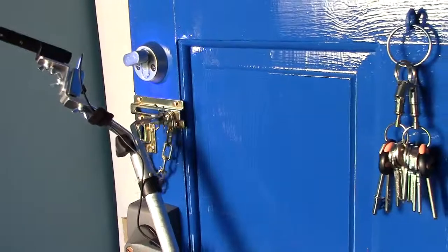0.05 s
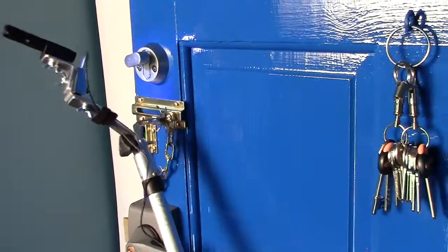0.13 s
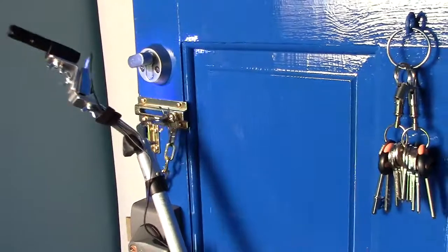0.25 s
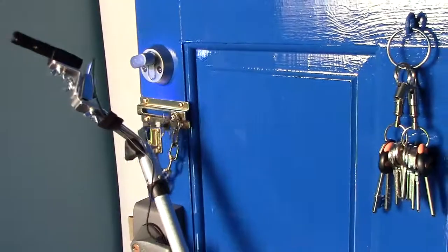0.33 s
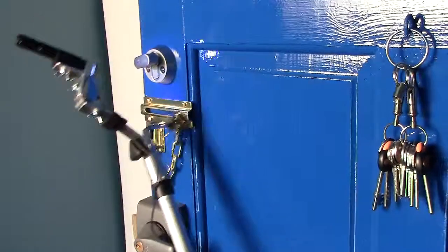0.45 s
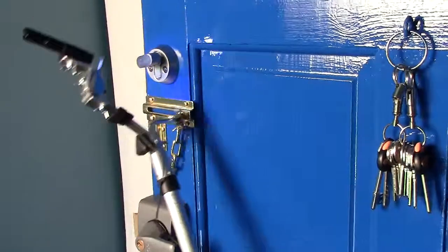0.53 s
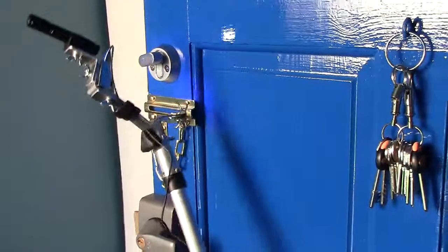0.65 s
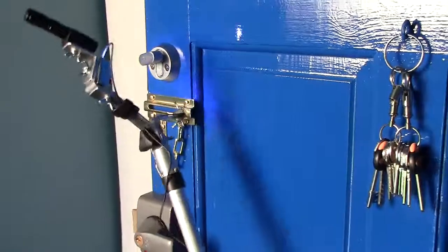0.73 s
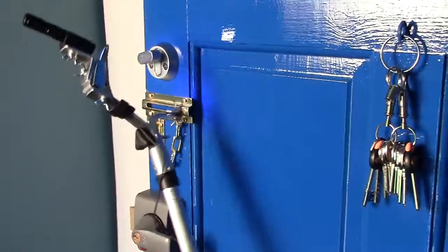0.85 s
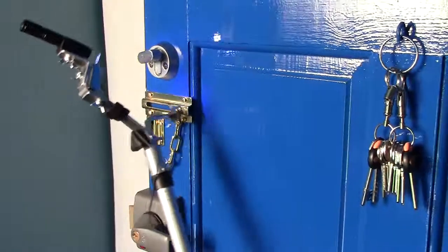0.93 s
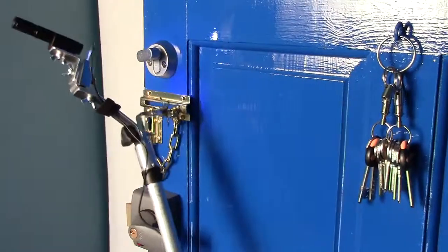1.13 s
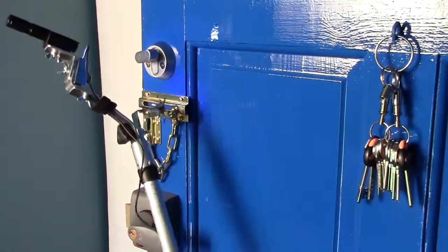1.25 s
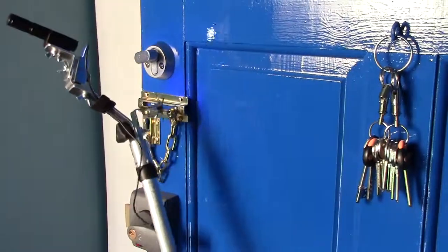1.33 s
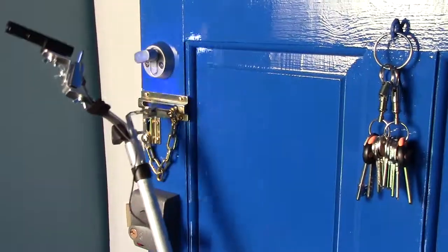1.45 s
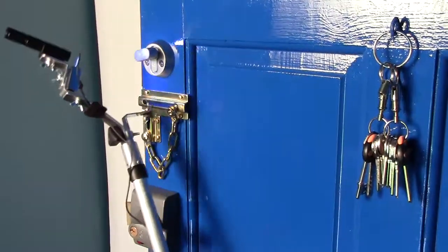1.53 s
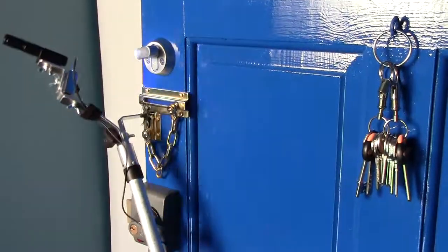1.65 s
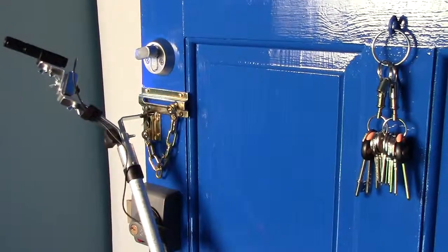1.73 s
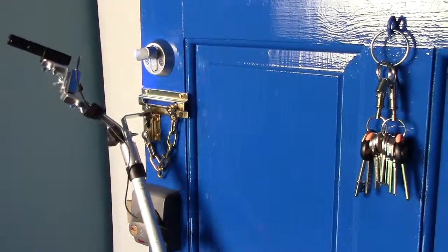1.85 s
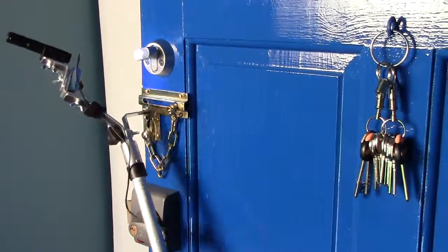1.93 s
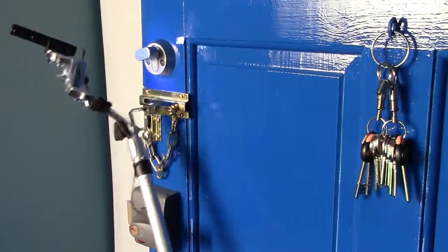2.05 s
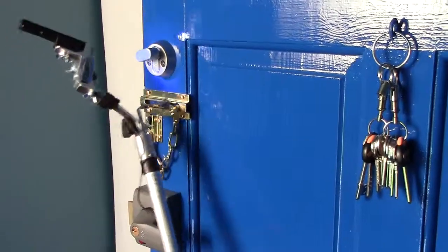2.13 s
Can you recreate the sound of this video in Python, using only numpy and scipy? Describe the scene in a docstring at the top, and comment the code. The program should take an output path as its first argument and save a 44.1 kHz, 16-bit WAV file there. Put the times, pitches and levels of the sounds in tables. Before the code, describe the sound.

Door chain clacking against its metal slide, loudest in the first second, with gritty rubbing and tiny high clinks; afterwards dull door knocks, a light brush and a single tick over quiet indoor hum, heard close.

```python
"""A metal pick tool works a brass door chain in its slide, in a small hard hallway with steady air and a low hum.
The stud's drag (dense random grains) and dull door knocks (slow-swelling low modes) open the scene; dry clacks
(shaped noise cracks over ringing plate modes) follow, with thin clinks of the links (high resonators) among them.
Later the tool brushes the door (fading band of noise) amid more knocks, and its hook gives one tick (short modes).
All the near sounds bounce off the hallway (banded, decaying noise as an echo tail)."""
import sys
import numpy as np
from scipy import signal
from scipy.fft import rfft, irfft
from scipy.io import wavfile
from scipy.ndimage import uniform_filter1d

SR = 44100
rng = np.random.default_rng(int(sys.argv[2]) if len(sys.argv) > 2 else 0)


def int16_out(signal):
    """Quantize to a 16-bit WAV file."""
    q = np.round(np.clip(np.atleast_2d(signal).T, -1, 1) * 32767)
    wavfile.write(sys.argv[1], SR, q.astype(np.int16))


N = 94815  # samples

# Steady air in the hallway: [f/Hz, density level/dB per Hz]
AIR = [(25, -80), (40, -72), (63, -77), (125, -78), (250, -79), (400, -84), (630, -83), (1000, -88),
       (2000, -93), (4000, -97.5), (6300, -101.5), (10000, -106), (13000, -109), (16000, -115)]
# Stereo spread of that air: [f/Hz, side minus mid level/dB]
AIR_SIDE = [(30, -15), (250, -1.5), (1000, -6.5), (4000, -7.5), (14000, -7)]
HUM_HZ, HUM_DB, HUM_T60_S = 41.5, -56, 0.68  # dB is RMS

# Stud dragging along the slide, before its colour: [t/s, level/dB]
DRAG_LEVEL = [(0, -54.5), (.06, -88), (.17, -69), (.19, -48.5), (.25, -54.5), (.30, -62.5), (.345, -52),
              (.40, -49), (.50, -48.5), (.58, -38.5), (.66, -44), (.74, -55), (.82, -77)]
# Colour of the metal rub: [f/Hz, level/dB]
DRAG_TONE = [(350, 13.5), (700, 10), (1150, 19), (1700, 8.5), (3000, 9), (5000, 4), (8000, -3),
             (14000, -22)]
DRAG_GRAINS_PER_S, DRAG_UNEVEN_DB = 1700, 5

# Knocks on the door: [t/s, level/dB, deep modes level/dB, middle modes level/dB, upper modes level/dB]
DOOR_KNOCKS = [(.002, -34, -2.5, -11, -3.5), (0.176, -33, -0.5, 4.5, -13), (.203, -25.5, -8, -22, 0),
               (.211, -26, -22, -28, 2.5), (0.236, -33, 2, -5.5, -0.5), (.326, -33, 3, -3.5, 3.5),
               (0.631, -44, 13, -1, 7), (1.299, -32.5, -29, 2, -1.5), (1.320, -30.5, -4.5, 2, -13),
               (1.345, -37, -12, -7, 0), (1.366, -26, -11, -12, -27), (1.889, -33, 2.5, -29, -22)]
# Modes of the door panel: [f/Hz, level/dB, t60/s]
DOOR_MODES = [(87.5, -1, 0.056), (104.7, -13, 0.26), (256.4, -12.5, 0.11), (280, -0.5, 0.083),
              (391.6, -8, 0.037), (435.5, 3.5, 0.025), (563, -2, 0.026), (806, -13.5, 0.057)]
# Group of each door mode: [0 deep, 1 middle, 2 upper]
DOOR_MODE_GROUP = [0, 0, 1, 1, 2, 2, 2, 2]
KNOCK_SWELL_CYCLES = 8.4  # the push on a mode falls 60 dB in this many cycles

# Reflections in the hallway: [f/Hz, t60/s, level/dB, side minus mid level/dB]
HALL_BANDS = [(306, 0.13, 2.5, -19), (1200, 0.28, -1, -20.5), (3000, 0.23, -0.5, -21),
              (5660, 0.26, -5, -8.5), (12100, 0.12, -5, -17)]
HALL_GAP_S, HALL_BUILD_S = 0.001, 0.0058

# Tool and stud strike the slide: [t/s, level/dB, chatter decay/ms (held to 0.1-8), plate ring level/dB,
# plate left free (held to 0.1-1), then colour level/dB at each of STRIKE_COLOUR_HZ]
STRIKES = [(.1770, -36.5, 5.3, -30, .4, 0, -3, 0, -11, -34),
           (.1880, -33.5, 3, -18, .4, 5.5, 5, -2, -12, -36),
           (0.203, -23, 1.7, -20, .4, -1, 0, -8, -17, -21),
           (.2050, -20.5, 2.4, -8.5, 0.73, -2.5, -5, -7, -9, -21),
           (.2376, -24, 3.3, -8, .4, -18, -0.5, -8, -23, -33),
           (0.353, -30, 2.1, -17, 0.59, -27, 21, -17, 0, -26),
           (.3540, -5, 3, -7.5, 0.98, -26, -5, -12.5, -9, -7.5),
           (0.3563, 1.5, 2.4, -14, 0.74, -25, -15.5, -20.5, -16, -17.5),
           (.3730, -29, 0.62, -33, .5, -39, -19, -18, -10, 10),
           (.4360, -18.5, 6.3, -15, 0.35, -25, -19, -5.5, -12.5, -26),
           (.5152, -19.5, 3.1, -12, 0.24, -53, -1, -8.5, -11.5, -35),
           (.5480, -0.5, 1.06, -6, 0.25, -42, -29, -17.5, -14, -10),
           (.5510, -5, 3.1, -8, 0.43, -24, -10.5, -13.5, -12.5, -15.5),
           (0.5607, -9.5, 1.2, -5, 0.37, -15.5, -4, -22, -11, -12),
           (.6283, -5.5, 3.8, -16, 0.94, -45, -16, -17, -20, -23),
           (0.6434, -15, 2.1, -6, .3, -22, -24, -9, -12.5, -13),
           (0.67, -8, 5, -13, 0.32, -27, -9.5, -16, -16.5, -37),
           (0.705, -29.5, 2.1, -28, .3, -13, -24, -14, -10.5, -1),
           (0.8328, -26, 2.4, -11, 0.37, -10.5, -2, -8.5, -17.5, -49),
           (.9690, -32, 0.3, -22, .3, -26, -25, -22, -23, -33),
           (1.0493, -21.5, 1.55, -19, 0.32, -1, 3.5, -10, -21.5, -34)]
# Where the strike colours apply: [f/Hz]
STRIKE_COLOUR_HZ = [550, 1200, 2500, 5000, 10000]
# Colour shared by all cracks: [f/Hz, level/dB]
CRACK_TONE = [(300, 20), (550, 27), (1200, 21.5), (2500, 28.5), (5000, 31), (10000, 16.5), (13000, 3.5),
              (16000, -7)]
# Modes of the slide plate when free: [f/Hz, level/dB, t60/s]
PLATE_MODES = [(807, -8.5, 0.054), (1120, -1.5, 0.037), (1198, -1.5, 0.068), (1270, -3, 0.037),
               (1370, -5, 0.039), (1690, -23, 0.03), (2770, -10, 0.018), (3115, -7.5, 0.025),
               (3670, -8, .025), (3950, -22, 0.031), (4530, -2, 0.021), (5200, 1, 0.026),
               (5540, -12, 0.017), (7460, 0.5, 0.029)]
MODE_SCATTER_DB = 3.0
FIRST_TOUCH = 4.95  # opening spike against the chatter's starting spread
PRESSED_DETUNE = 0.037  # pitch spread as a fraction, scaled by how far the plate is pressed
CLACK_LOW_HZ = 272

# Chain links touch: [t/s, level/dB, favoured mode f/Hz, fall away from it/dB per octave]
LINK_TOUCHES = [(0.313, -43, 6450, 67), (0.329, -43, 5870, 69), (.467, -31.5, 5230, 2),
                (0.495, -40, 11250, 62), (0.541, -32.5, 10500, 61), (.598, -36, 12500, 4),
                (0.677, -31, 13300, 50)]
# Pitches of one link: [f/Hz]
LINK_MODE_HZ = [5200, 5750, 6450, 9055, 9690, 11250, 13300, 15100]
# Ring of each of those pitches: [level/dB, t60/s]
LINK_MODES = [(0.5, 0.12), (-10, 0.078), (-1, 0.011), (-18.5, 0.25), (-12, 0.093), (-6.5, 0.036),
              (-15, 0.0226), (-22, 0.055)]

# Tool brushes the door; the level is the RMS at its start, before the fade
SCUFF_S, SCUFF_DB, SCUFF_T60_S, SCUFF_LOW_HZ, SCUFF_HIGH_HZ = 1.298, -45.5, 0.3, 448, 1420

# Tick of the tool's hook: [t/s, level/dB]
HOOK_TICKS = [(1.8858, -21)]
# Modes of the hook: [f/Hz, level/dB, t60/s]
HOOK_MODES = [(615, -15.5, 0.048), (917, -12.5, 0.023), (1337, -14, 0.092), (1472, -12.5, 0.051),
              (1763, -3, 0.019), (1928, -7.5, 0.05), (3350, -3, 0.015), (5300, -14.5, 0.006),
              (6650, -9, 0.01), (9600, -22.5, 0.011), (11600, -18, 0.005)]

PAN_DB = 0.06  # left up and right down by this much
HEADROOM, CUTOFF_HZ, OFFSET = .95, 16600, 0.01  # HEADROOM and OFFSET in full scale


def amp(db):
    """Turn decibels into a linear gain."""
    return 10 ** (np.asarray(db, float) / 20)


def at_hz(points, hz, axis=1):
    """Read a table column at any frequency, along a log-frequency line."""
    points = np.array(points, float)
    return np.interp(np.log(hz), np.log(points[:, 0]), points[:, axis])


def place(s, bursts):
    """Sum short bursts, one row each, at their times."""
    length = bursts.shape[1]
    out = np.full(N + length, 1e-18)  # inaudible floor, never exactly zero
    starts = (np.asarray(s) * SR).astype(int).clip(0, N - 1)
    np.add.at(out, starts[:, None] + np.arange(length), bursts)
    return out[:N]


def ring(x, hz, t60):
    """Drive a damped resonator: a unit click sets a sine of height 1 ringing."""
    radius = amp(-60 / (t60 * SR))
    angle = 2 * np.pi * hz / SR
    return signal.lfilter([0, np.sin(angle)], [1, -2 * radius * np.cos(angle), radius * radius], x)


def bands():
    """Half-octave band-passes with their centres."""
    edges = 23 * 2 ** np.arange(0, 9.6, .5)
    return [(np.sqrt(low * high), signal.butter(2, [low, high], "band", fs=SR, output="sos"))
            for low, high in zip(edges, edges[1:])]


def causal_pulse(db):
    """Shortest pulses that have these spectra (rows of dB on an FFT grid) and start at once."""
    cepstrum = irfft(db * np.log(10) / 20)
    half = cepstrum.shape[1] // 2
    # fold the cepstrum forward in time: minimum phase
    cepstrum[:, 1:half] *= 2
    cepstrum[:, half + 1:] = 0
    return irfft(np.exp(rfft(cepstrum)))


def room_tone():
    """Steady air from banded noise, and a wavering deep hum from a noise-driven resonator."""
    white = np.sqrt(SR / 2) * rng.standard_normal((2, 2, N + SR))  # 0 dB per Hz
    air = 0
    for k, (hz, sos) in enumerate(bands()):
        mid, side = signal.sosfilt(sos, white[k % 2])[:, SR:]  # drop the filter's first second
        spread = amp(at_hz(AIR_SIDE, hz)) * side * [[1], [-1]]
        air = air + amp(at_hz(AIR, hz)) * (mid + spread)
    hum = ring(rng.standard_normal(N + SR), HUM_HZ, HUM_T60_S)[SR:]
    return air + amp(HUM_DB) * hum / hum.std()


def drag():
    """Dense uneven grains of metal rubbing on metal."""
    level = np.interp(np.arange(N) / SR, *np.transpose(DRAG_LEVEL))
    heights = amp(DRAG_UNEVEN_DB * np.minimum(rng.exponential(1, N), 4))
    signed = heights * rng.choice([-1, 1], N)
    grains = signed * (rng.random(N) < DRAG_GRAINS_PER_S / SR)
    grains = amp(level) * grains / grains.std()
    out = 0
    for k, (hz, sos) in enumerate(bands()):
        if hz > 300:
            # neighbouring bands take opposite signs
            out = out + (-1) ** k * amp(at_hz(DRAG_TONE, hz)) * signal.sosfilt(sos, grains)
    return out


def door():
    """Soft contacts let the door panel's low modes swell over a few cycles, then die."""
    rows, out = np.array(DOOR_KNOCKS), 0
    for (hz, level, t60), group in zip(DOOR_MODES, DOOR_MODE_GROUP):
        heights = amp(rows[:, 1] + level + rows[:, 2 + group])
        push = ring(place(rows[:, 0], heights[:, None]), hz, KNOCK_SWELL_CYCLES / hz)
        # offsets the gain of one resonance driving another
        trim = 2 * np.log(1000) * hz / KNOCK_SWELL_CYCLES / SR
        out = out + ring(push, hz, t60) * trim
    return out


def hallway(x):
    """Dense reflections that build up, then die by band, mostly alike in both ears."""
    age = np.arange(SR // 2) / SR
    build = 1 - np.exp(-(age - HALL_GAP_S).clip(0) / HALL_BUILD_S)
    white, tail = rng.standard_normal((2, 2, len(age))), 0
    for k, (hz, sos) in enumerate(bands()):
        t60 = at_hz(HALL_BANDS, hz)
        even_energy = np.sqrt(2 * np.log(1000) / t60 / SR)  # long and short decays weigh alike
        fade = amp(at_hz(HALL_BANDS, hz, axis=2) - 60 * age / t60) * even_energy
        mid_side_gain = amp([[0], [at_hz(HALL_BANDS, hz, axis=3)]])
        tail = tail + signal.sosfilt(sos, white[k % 2]) * fade * build * mid_side_gain
    mid, side = signal.fftconvolve(tail, x[None], axes=1)[:, :N]
    return mid + side * [[1], [-1]]


def clacks():
    """Sharp contacts chatter as broad cracks; the plate rings on, shorter and off pitch where pressed."""
    rows = np.array(STRIKES)
    age = np.arange(4096) / SR
    decay_ms = rows[:, 2:3].clip(.1, 8)
    chatter = rng.standard_normal((len(rows), 600)) * np.exp(-1000 * age[:600] / decay_ms)
    chatter[:, 0] = FIRST_TOUCH
    chatter /= np.sqrt(np.sum(chatter ** 2, axis=1, keepdims=True))
    scatter, detune = rng.standard_normal((len(rows), 2, len(PLATE_MODES))).transpose(1, 0, 2)
    free = rows[:, 4:5].clip(.1, 1)

    def level(hz):
        """Strike level plus its colour, in dB."""
        colour = [np.interp(np.log(hz), np.log(STRIKE_COLOUR_HZ), row[5:]) for row in rows]
        return rows[:, 1:2] + colour

    grid = np.linspace(1, SR / 2, 1025)
    # the chatter's chance colour, smoothed, is taken out of the crack
    own_db = 10 * np.log10(uniform_filter1d(np.abs(rfft(chatter, 2048)) ** 2, size=31))
    shape = causal_pulse(level(grid) + at_hz(CRACK_TONE, grid) - own_db)
    crack = signal.fftconvolve(chatter, shape, axes=1)

    hz, db, t60 = np.transpose(PLATE_MODES)
    heights = amp(level(hz) + db + rows[:, 3:4] + MODE_SCATTER_DB * scatter)
    pitch = hz * (1 + PRESSED_DETUNE * (1 - free) * detune)
    modes = 0
    for k in range(len(hz)):
        sine = np.sin(2 * np.pi * pitch[:, [k]] * age)
        fade = amp(-60 * age / (t60[k] * free))
        modes = modes + (-1) ** k * heights[:, [k]] * sine * fade
    low_cut = signal.butter(2, CLACK_LOW_HZ, "high", fs=SR, output="sos")
    return signal.sosfilt(low_cut, place(rows[:, 0], crack) + place(rows[:, 0], modes))


def clinks():
    """Links ring thin and high on shared modes; each touch favours one mode."""
    s, db, best_hz, fall = np.transpose(LINK_TOUCHES)
    out = 0
    for hz, (level, t60) in zip(LINK_MODE_HZ, LINK_MODES):
        octaves_away = np.abs(np.log2(hz / best_hz))
        heights = amp(db + level - fall * octaves_away)
        out = out + ring(place(s, heights[:, None]), hz, t60)
    return out


def scuff():
    """A dull brush on the paint: band-passed noise that dies away."""
    age = np.arange(SR // 4) / SR
    band = signal.butter(1, [SCUFF_LOW_HZ, SCUFF_HIGH_HZ], "band", fs=SR, output="sos")
    rub = signal.sosfilt(band, rng.standard_normal(len(age)))
    fade = amp(SCUFF_DB - 60 * age / SCUFF_T60_S)
    return place([SCUFF_S], (fade * rub / rub.std())[None])


def hook():
    """One clean tick: a click sets the hook's short modes ringing, with alternating signs."""
    s, db = np.transpose(HOOK_TICKS)
    out = 0
    for k, (hz, level, t60) in enumerate(HOOK_MODES):
        out = out + (-1) ** k * ring(place(s, amp(db + level)[:, None]), hz, t60)
    return out


def scene():
    """Near sounds and their reflections, panned slightly, over the room tone."""
    near = clacks() + drag() + clinks() + hook() + door() + scuff()
    panned = (near + hallway(near)) * amp([[PAN_DB], [-PAN_DB]])
    return panned + room_tone()


def record(dry):
    """The highest peaks are rounded, the top is cut; a small steady offset is added."""
    rounded = dry / (1 + (dry / HEADROOM) ** 4) ** .25
    top_cut = signal.cheby2(12, 70, CUTOFF_HZ, fs=SR, output="sos")
    return signal.sosfilt(top_cut, rounded) + OFFSET


dry = scene()
out = record(dry)
int16_out(out)
```